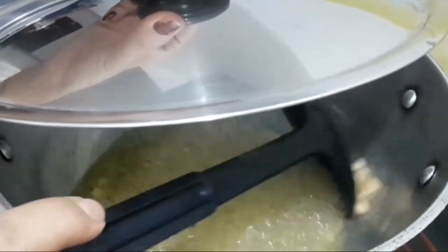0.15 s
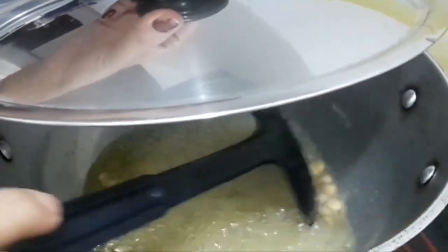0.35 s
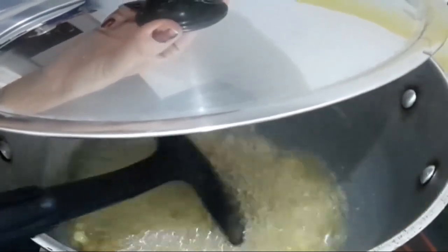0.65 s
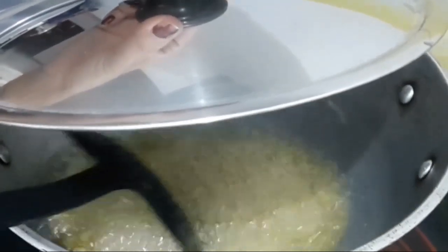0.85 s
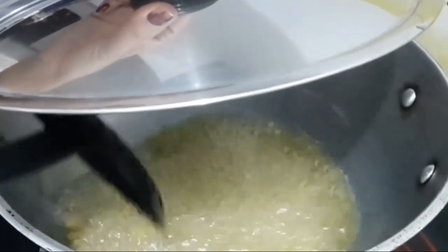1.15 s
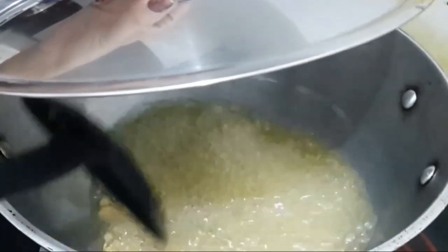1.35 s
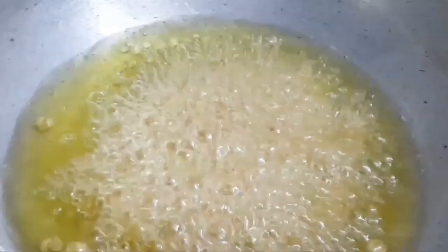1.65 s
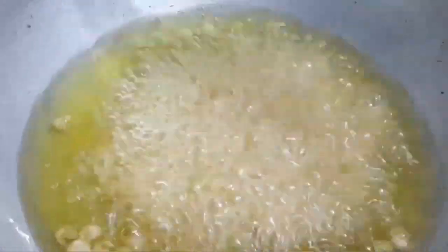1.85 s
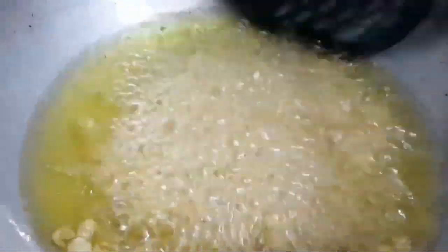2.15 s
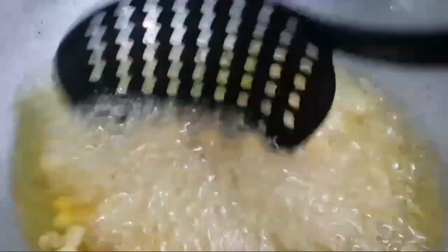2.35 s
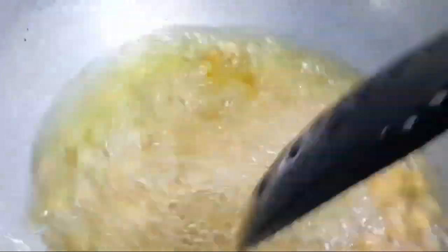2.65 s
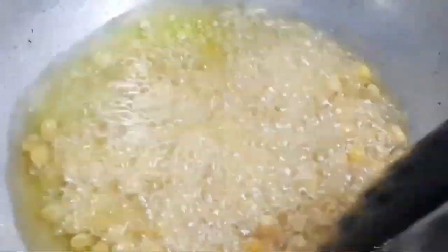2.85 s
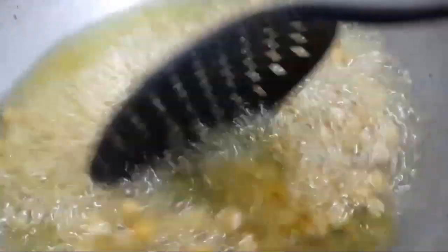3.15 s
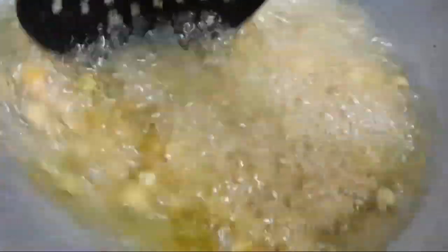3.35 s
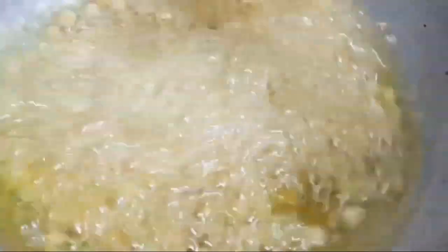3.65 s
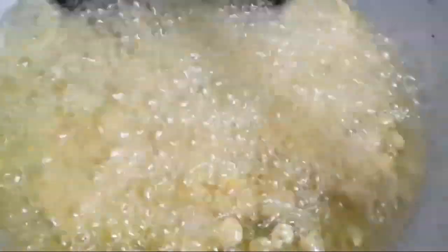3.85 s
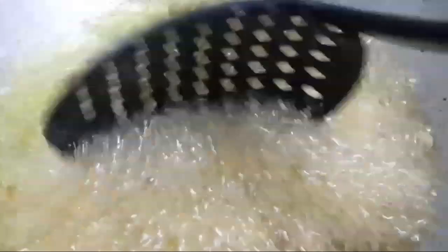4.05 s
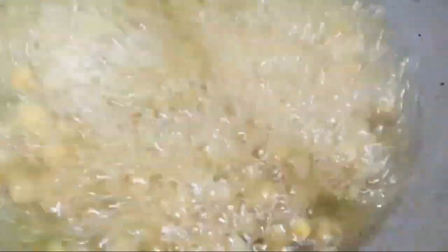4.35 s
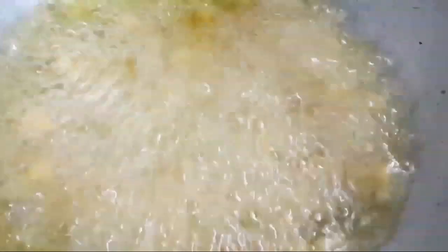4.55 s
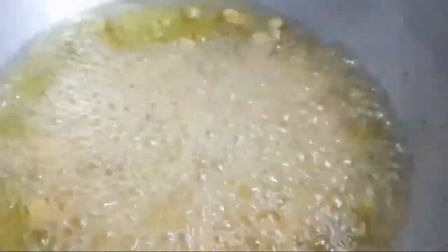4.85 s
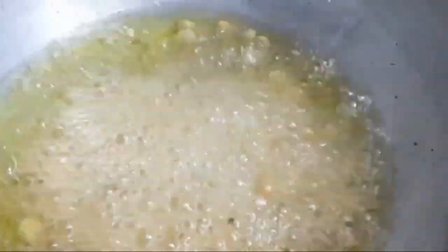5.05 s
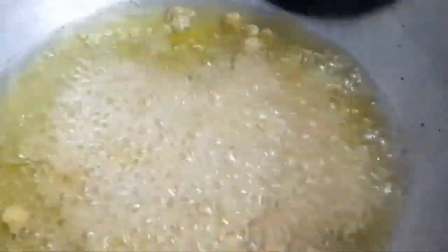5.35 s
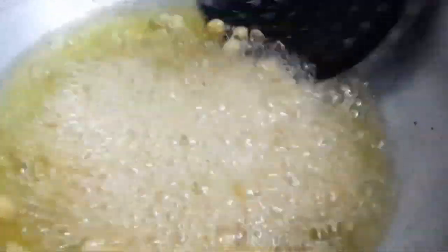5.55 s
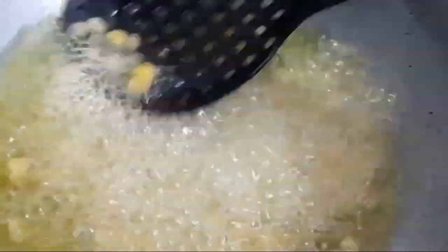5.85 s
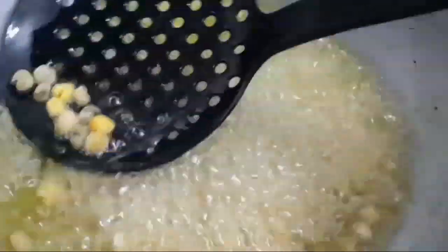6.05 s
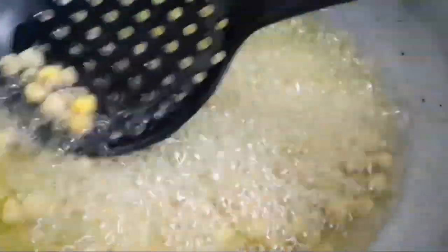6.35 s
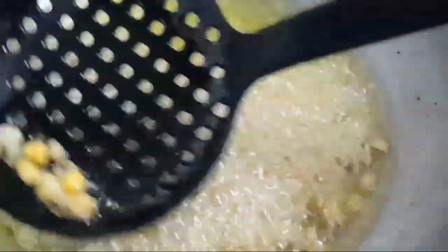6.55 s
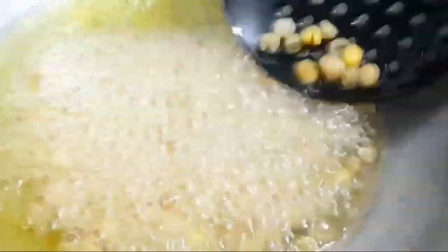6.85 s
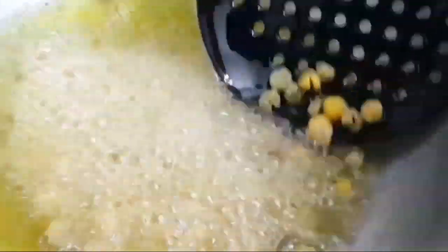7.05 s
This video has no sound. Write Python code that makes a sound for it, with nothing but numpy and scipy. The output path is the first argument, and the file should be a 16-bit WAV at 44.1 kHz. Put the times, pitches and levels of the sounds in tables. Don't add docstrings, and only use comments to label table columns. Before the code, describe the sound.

A heavy frying roar comes first, with low bubbles thumping in a metal pot partly covered by its lid. After nearly two seconds it stops, silent for an instant. Then comes an open pan, soft at first: airy sizzling full of crisp crackles, tiny ringing blisters and spitting water drops, swelling unevenly. Close stereo phone microphone in a small kitchen, brighter on the left, duller on the right.

```python
import sys
import numpy as np
from scipy import signal
from scipy.fft import rfft, irfft, next_fast_len
from scipy.io import wavfile
from scipy.ndimage import uniform_filter1d, map_coordinates

SR = 44100
rng = np.random.default_rng(int(sys.argv[2]) if len(sys.argv) > 2 else 0)


def magnitude_from_level(level_db):
    exponent = np.asarray(level_db, float) / 20
    return 10 ** exponent


def dump(signal):
    limited = np.clip(np.atleast_2d(signal).T, -1, 1)
    pcm = np.round(limited * 32767).astype(np.int16)
    wavfile.write(sys.argv[1], SR, pcm)


N = 317961
POT, PAN = 0, 1
CUT_S, WAKE_S = 1.9, 2.03


def unit(x):
    return x / np.sqrt(np.mean(x ** 2) + 1e-20)


def along(points, hz):
    f, value = np.transpose(points)
    return np.interp(np.log(hz + 1), np.log(f + 1), value)


def wobble(rate):
    knots = rng.standard_normal(int(N * rate / SR) + 4)
    return map_coordinates(knots, [np.arange(N) * rate / SR])


def filtered(x, response):
    m = next_fast_len(N + 8192)
    return irfft(rfft(x, m) * response(np.fft.rfftfreq(m, 1 / SR)), m)[..., :N]


def rings(s, size, hz, t60, rise, rough, order, count=1, swell=.001):
    t = np.arange(order) / SR
    life = t / t60[:, None]
    turn = 2 * np.pi * hz[:, None] * t * (1 + rise * np.minimum(life, 1))
    grit = uniform_filter1d(rng.standard_normal(turn.shape), count)
    wave = np.sin(turn) * (1 + rough * np.sqrt(count) * grit)
    wave *= magnitude_from_level(-60 * life) * (1 - np.exp(-life / swell))
    wave *= (size / np.abs(wave).max(1))[:, None]
    at = np.round(s * SR).astype(int)[:, None] + np.arange(order)
    return np.bincount(at.ravel(), wave.ravel(), N + order)[:N]


def bubbles(lo_hz, hi_hz, cycles, spread_db, count, order):
    u = rng.random((count, 4))
    hz = lo_hz * (min(hi_hz, SR / 2.4) / lo_hz) ** u[:, 1]
    life = cycles * 4 ** (u[:, 3] - .5)
    rank = np.minimum(-np.log(1 - u[:, 2]), 4.5)
    size = hz / np.sqrt(life) * magnitude_from_level(spread_db * rank)
    grains = rings(u[:, 0] * (N - 1) / SR, size, hz, life / hz, rise=.08, rough=0.15, order=order)
    hiss = filtered(rng.standard_normal(N), lambda f: (f > lo_hz / 2) & (f < 1.5 * hi_hz))
    return unit(grains), unit(hiss)


def froth():
    gurgle = lambda: bubbles(60, 1067, cycles=10.6, spread_db=2, count=2000, order=800)
    body = lambda: bubbles(784, 3800, cycles=34, spread_db=2.0, count=3500, order=450)
    fizz = lambda: bubbles(2800, 16000, cycles=55, spread_db=2.5, count=7000, order=220)
    return [np.array([make(), make()]) for make in (gurgle, body, fizz)]


# (time [s], vigour [dB], coarse over fine bubbles [dB])
VIGOUR = [
    [(0, -24, 1), (.125, -24, -0.5), (.27, -23.5, 1.5), (.45, -25.5, -2), (.63, -28, 1), (1.0, -27.5, -0.5),
     (1.25, -27.5, 0.5), (1.5, -28.5, -0.5), (1.8, -27.5, 2)],
    [(2.3, -46, -2), (2.8, -44.5, -1), (3.27, -44, 0.5), (3.45, -38, -0.5), (3.7, -33.5, -2.5),
     (3.85, -36.5, 0.5), (4.15, -35.5, 0.5), (4.65, -34.5, -1.5), (5.05, -38.5, 2.5), (5.2, -36.5, -0.5),
     (5.65, -36, -0.5), (5.95, -35.5, -3), (6.1, -41.5, -.5), (6.45, -40, 0.5), (6.57, -37, 1.5),
     (6.82, -38, 1.5), (6.97, -35.5, -0.5), (7.21, -33.5, -2)],
]
# (gurgle [dB], body [dB], fizz [dB])
SIZE_DB = [
    (-14, -12, 0.078),
    (-16, -9, 0.37),
]
COARSE_SHARE = (1.1, 0.8, 0)
FLARE_SHARE = (.4, .5, 1.0)
# (time [s], level [dB], half length [s])
FLARES = [(0.385, -4, .012), (0.506, -2.5, .01), (.575, -2.5, .012), (1.36, -3, 0.022), (2.315, 0.5, .02),
          (2.438, 3.5, .012), (2.67, 4.5, .05), (3.35, 0, .04), (3.922, 4, .01), (5.715, 5, 0.033),
          (5.789, 5.5, 0.0093), (5.859, 0, .015)]


def levels(vessel):
    wake_db, wake_time_s = (-23, -21, -17.5), (0.13, 0.13, .09)
    duck_s, duck_db, duck_time_s = 5.797, -3, .018
    t = np.arange(N) / SR
    s, vigour_db, coarse_db = np.transpose(VIGOUR[vessel])
    since = np.maximum(t - duck_s, 0) / duck_time_s
    base_db = np.interp(t, s, vigour_db) + vessel * duck_db * since * np.exp(1 - since)
    flare_db = sum(db * np.exp(-((t - at) / half) ** 2) for at, db, half in FLARES)
    waking = lambda time: vessel * np.exp(-np.maximum(t - WAKE_S, 0) / time)
    rows = zip(SIZE_DB[vessel], COARSE_SHARE, FLARE_SHARE, wake_db, wake_time_s)
    return [base_db + under + coarse * np.interp(t, s, coarse_db) + flare * flare_db + wake * waking(time)
            for under, coarse, flare, wake, time in rows]


def patchy(x, depth_db):
    z = signal.stft(x, nperseg=128)[2]
    field = uniform_filter1d(rng.standard_normal(z.shape[1:]), 3, 0)
    field = uniform_filter1d(field, 9, 1)
    return signal.istft(z * magnitude_from_level(depth_db * unit(field)), nperseg=128)[1][:, :N]


# (frequency [Hz], level [dB per Hz])
GURGLE = [
    [(15, -63.5), (25, -27), (76, -25.5), (117, -17), (172, -22), (210, -27), (249, -18.5), (309, -18),
     (484, -11.5), (539, -5.5), (610, -2), (898, -16), (1000, -14), (1300, -47), (2200, -120)],
    [(15, -53), (25, -15.5), (119, -16), (231, -11.5), (265, -13.5), (372, -5), (448, -5.5), (548, -4.5),
     (806, -4), (1000, 0), (1300, -41.5), (2200, -120)],
]
# (frequency [Hz], level [dB per Hz])
BODY = [
    [(500, -34), (850, -16), (1100, -7.5), (1260, 2), (1490, 2.5), (2290, -1), (2650, 1), (3500, -9.5),
     (4550, -33), (7700, -120)],
    [(500, -38.5), (850, -9.5), (1090, -3), (1440, -4), (1550, -5), (2040, -2.5), (2470, -4.5),
     (3500, -8.5), (4550, -12), (7700, -120)],
]
# (frequency [Hz], level [dB per Hz])
FIZZ = [
    [(1760, -40), (3000, -10.5), (3590, -10.5), (5470, -4.5), (6860, -1), (9890, -16.5), (14400, -19.5),
     (15600, -20.5)],
    [(1760, -35), (3000, -8.5), (6820, -6), (7830, -2.5), (8800, -2), (10300, -0.5), (12500, -9.5),
     (14600, -15), (15600, -15.5)],
]
# (frequency
# [Hz], width [Hz], level [dB])
HOLLOW = [
    [(163, 14, 6.5), (376, 12, 4), (545, 14, 6), (610, 13, 2.5), (762, 16, 7.5), (814, 20, 6),
     (1276, 25, 4), (1558, 30, 5.5), (1670, 35, 3.5), (6870, 1100, 0.5)],
    [(165.5, 14, 9.5), (241.3, 6.1, 11.5), (392, 13, 5.5), (562, 12, 7), (870, 20, -12), (1100, 62, 5),
     (1210, 9.9, 6), (2800, 1500, -0.5), (10200, 1200, 2)],
]
# (pot [dB], pan [dB])
PATCHY_DB = (1.5, 1.78)


def boiling(sizes, vessel):
    clumps = 0.45 * wobble(14) + .8 * wobble(50)
    hollow_db = lambda f: sum(db / (1 + (2 * (f - hz) / width) ** 2) for hz, width, db in HOLLOW[vessel])
    # (colour, clump dB, own dB, lift dB)
    moods = [(GURGLE, .5, 1.2, .2), (BODY, .6, .8, .8), (FIZZ, .85, .75, .3)]
    share = (.14, .28)[vessel]
    out = 0
    for pair, (colour, clump_db, own_db, lift_db), db in zip(sizes, moods, levels(vessel)):
        pair = np.sqrt(share) * pair[:, 0] + np.sqrt(1 - share) * pair[:, 1]
        pair = filtered(pair, lambda f: magnitude_from_level(along(colour[vessel], f) + hollow_db(f)))
        if colour is FIZZ:
            pair = patchy(pair, PATCHY_DB[vessel])
        swell_db = db + lift_db + clump_db * clumps + own_db * wobble(25)
        out = out + unit(pair) * magnitude_from_level(swell_db)
    return out


def spits(table, vessel):
    s, db, hz, t60, crack_db = np.transpose(table)
    t60 = np.clip(t60, .001, .03)
    same = np.ones(len(s))
    ring = rings(s, magnitude_from_level(db + 0.5), hz, 1.72 * t60, rise=0.037, rough=0.57, order=800, count=9, swell=.025)
    broad = magnitude_from_level(db + crack_db - 3) * np.sqrt(SR / hz)
    crack = 1.15 * rings(s, broad, 9000 * same, 0.00074 * same, rise=0, rough=1.7, order=100)
    puff = rings(s, magnitude_from_level(db - 10.5), 6000 * same, 1.7 * t60, rise=0, rough=8.0, order=500)
    port = lambda f: magnitude_from_level(4.5 + 0.64 * np.where(f > 3000, along(FIZZ[vessel], f), -11))
    dry = ring + filtered(crack + puff, port)
    dry = filtered(dry, lambda f: f ** 4 / (f ** 4 + 1000 ** 4))
    t = np.arange(2600) / SR
    walls = [unit(rng.standard_normal(len(t)) * magnitude_from_level(-60 * t / 0.097)) / np.sqrt(len(t)) for side in range(2)]
    near = dry + magnitude_from_level(-13) * signal.fftconvolve(dry, walls[0])[:N]
    far = magnitude_from_level(-5.0) * signal.fftconvolve(dry, walls[1])[:N]
    return np.array([near, far])


# (time [s], peak [dB], pitch [Hz], t60 [s], crack against the ring [dB])
POT_SPITS = [
    (0.1344, -15, 4970, 0.0092, -14),
    (0.3345, -11, 6700, 0.0043, -18),
    (0.5253, -12.5, 8000, 0.0049, -10),
    (0.8373, -15.5, 6400, 0.0042, -24),
    (0.9803, -14, 6870, 0.0066, -29),
    (1.1167, -13, 6500, 0.003, -17.5),
    (1.7463, -16, 6470, 0.004, -15),
    (1.7637, -14.5, 7010, 0.0067, -15.5),
]
# (time [s], peak [dB], pitch [Hz])
POT_CRACKLES = [(0.0513, -18, 6100), (0.4035, -13, 7150), (0.589, -9, 6400), (0.6424, -14, 6800),
                (0.73, -19, 6730), (0.774, -15, 6870), (0.9605, -12, 6250), (1.349, -11, 7200),
                (1.4144, -11.5, 7050), (1.5279, -10.5, 6400), (1.5943, -14, 6310), (1.6164, -16, 5820)]


def pot_drops():
    lesser = [(at, db - 2.5, hz, 0.0045, -24) for at, db, hz in POT_CRACKLES]
    return np.vstack([POT_SPITS, lesser])


# (time [s], peak [dB], pitch [Hz])
TICKS = [(2.094, -41.5, 10850), (2.2065, -30, 6780), (2.2639, -21, 9000), (2.3322, -24, 10470),
         (5.7627, -20.5, 10360), (2.4968, -24.5, 9640), (2.5614, -19, 10270), (2.6335, -17.5, 10200),
         (2.6465, -29, 11200), (2.6854, -21.5, 11140), (2.7081, -26, 6480), (2.7133, -21, 9440),
         (2.9974, -20.5, 6880), (5.9458, -27.5, 11430), (3.1758, -23.5, 7860), (3.4093, -22, 5810),
         (3.4699, -17.0, 10700), (3.5265, -16, 9680), (3.5617, -17, 8700), (4.1945, -17.0, 7880),
         (4.386, -21, 10200), (4.5858, -11.5, 10700), (5.3952, -23.5, 12600), (5.6886, -17, 13870),
         (5.9857, -21, 11500), (6.5297, -17.5, 9660), (6.5618, -14.5, 9370), (6.6249, -20.5, 6330),
         (6.7182, -19, 7620), (6.9819, -16, 8900)]
# (time [s], peak [dB])
SNAPS = [(2.39, -29.5), (2.5985, -22), (2.6752, -20.5), (2.7654, -19), (2.818, -22), (2.9514, -20),
         (3.1156, -20), (3.1434, -24), (3.7854, -14), (4.006, -10), (4.0565, -12.5), (4.0669, -12.5),
         (4.2643, -15.5), (4.2934, -21.0), (4.3036, -13), (4.4693, -16.5), (5.2782, -22.5), (5.557, -10.5),
         (5.8795, -16.0), (6.5685, -18), (6.9082, -17), (6.9182, -21.5), (7.0285, -10.5)]
# (time [s], peak [dB], pitch [Hz], t60 [s])
BLISTERS = [(2.3457, -27.5, 5700, 0.0054), (2.4543, -27, 6120, 0.006), (4.0974, -20.5, 5840, 0.007),
            (2.656, -24.5, 10700, 0.0047), (2.9417, -28.5, 8140, 0.0078), (3.3196, -18, 9540, 0.0087),
            (3.4996, -16.5, 7440, 0.0048), (3.8604, -17, 5900, 0.0067), (3.979, -14.5, 6610, 0.004),
            (4.084, -18.5, 10300, 0.0052), (4.1231, -23, 9330, 0.013), (4.2755, -17, 10070, 0.0069),
            (4.574, -21.5, 7800, 0.011), (4.7897, -17.5, 8700, 0.0063), (4.9226, -21, 10300, 0.0076),
            (5.299, -18.5, 6500, 0.0053), (5.3107, -14, 8680, 0.0061), (5.767, -11, 9980, 0.011),
            (5.7858, -16.5, 9520, 0.012), (5.832, -16, 10040, 0.0057), (5.9934, -19.5, 7680, 0.0067),
            (6.0296, -18.5, 9360, 0.012), (6.0654, -15, 7930, 0.0052), (6.2278, -24.5, 10180, 0.0061),
            (6.7789, -19, 9250, 0.015), (6.9503, -19, 7750, 0.0087), (7.0031, -16, 8360, 0.0085),
            (7.022, -15.5, 6590, 0.0046), (7.082, -18, 7020, 0.004), (7.1981, -18, 9340, 0.004)]
# (time [s], peak [dB], pitch [Hz], t60 [s], crack against the ring [dB])
POPS = [(2.264, -27, 3560, 0.0018, 0.5), (2.3107, -37, 3690, 0.009, -11), (2.3312, -36.0, 4060, 0.009, 3.5),
        (4.267, -23.5, 4000, 0.006, -11.5), (3.0037, -19, 3690, 0.0029, -11),
        (4.1394, -20, 5060, 0.013, -16), (4.3504, -17.5, 4180, 0.0021, -5),
        (4.7738, -23, 3840, 0.0085, -13), (4.8413, -25, 2070, 0.013, -9.5),
        (4.9582, -24, 5110, 0.0048, -11.5), (5.149, -18.5, 4200, 0.0042, -22.5),
        (5.1496, -20.5, 8170, .008, -25.5), (5.1502, -19.5, 9950, 0.009, -26),
        (5.3664, -16.5, 3790, 0.006, -9), (5.8984, -23.5, 2330, 0.0023, -8),
        (5.5313, -23.0, 4300, 0.0079, 0), (5.7373, -19.5, 5320, 0.0045, -15.5),
        (5.9263, -24.5, 2000, 0.0074, -16), (6.0685, -23, 2890, 0.0098, -2),
        (6.579, -17.5, 1905, 0.0014, -13.5), (6.6647, -18.5, 1680, 0.0015, -18.5),
        (6.9505, -18, 4310, 0.0024, -14.5), (7.013, -18.5, 5040, 0.0065, -11.5),
        (7.085, -24, 3840, 0.014, -8.0), (7.144, -15.5, 5450, 0.01, -8.5), (7.17, -26, 2900, 0.0026, -15)]
# (time [s], peak [dB], pitch [Hz])
CRACKLES = [(2.0502, -37, 5940), (2.1742, -32, 9350), (2.3144, -27.5, 8960), (2.4339, -24.5, 8830),
            (2.4681, -24.5, 10900), (2.5376, -23, 7750), (2.5854, -32, 10100), (2.8376, -33.5, 11110),
            (2.9115, -39.5, 9540), (2.9636, -21.5, 6240), (3.0959, -20.5, 8570), (3.2263, -23, 8340),
            (3.3702, -24.5, 10470), (3.4587, -12.5, 11020), (3.5439, -15.5, 10600), (3.581, -14.5, 10170),
            (3.6591, -14.5, 8230), (3.7797, -16, 9430), (3.7968, -21, 9220), (3.8437, -22.0, 10420),
            (3.9215, -18.5, 5000), (3.9807, -11, 9220), (4.1025, -25, 11500), (4.1715, -18.5, 1200),
            (4.3386, -14, 9430), (4.7187, -14, 6660), (5.0614, -17.5, 7970), (5.3196, -17, 7970),
            (5.4375, -18.5, 10800), (5.5777, -18, 10380), (5.6568, -15.5, 12660), (5.6985, -15.5, 8200),
            (5.7727, -17.5, 5500), (5.7915, -18, 11000), (5.8285, -17.5, 11540), (5.8575, -13, 10470),
            (5.9064, -14.5, 10420), (6.0373, -21, 9130), (6.0471, -20, 7430), (6.2339, -22.5, 8530),
            (6.264, -18.5, 10510), (6.295, -15, 10330), (6.3166, -27.5, 9910), (6.3578, -17, 10570),
            (6.4045, -18.5, 10210), (6.5158, -18, 8010), (6.5972, -15.5, 9430), (6.6983, -19.5, 9390),
            (6.8118, -20.5, 10500), (7.0332, -18.5, 11500), (7.0577, -15.5, 6300), (7.0945, -17, 2300),
            (7.0957, -13, 9170)]
# (time [s], peak [dB], pitch [Hz])
BEADS = [(2.1876, -42, 11770), (2.3913, -31, 8870), (2.4087, -38, 13460), (2.4924, -31.5, 10070),
         (2.656, -27.5, 6950), (2.7126, -32.5, 6360), (2.8484, -39, 2020), (2.9858, -39, 14010),
         (2.9972, -35.5, 1180), (3.005, -25, 10170), (3.1443, -32.5, 14050), (3.4488, -26.5, 5230),
         (3.4805, -27, 1180), (3.7179, -23, 11000), (3.844, -23.5, 5890), (3.8636, -30.5, 5800),
         (4.154, -25, 5460), (4.2, -24.5, 8170), (4.2187, -25, 6290), (4.2956, -30, 6560),
         (4.4698, -21.5, 8380), (4.4963, -24.5, 9480), (4.6434, -34.5, 5710), (4.7947, -30, 12720),
         (4.8859, -27, 3860), (4.9009, -23, 10020), (4.943, -27.5, 8260), (4.9471, -32, 13570),
         (5.2172, -30.5, 1190), (5.2789, -23, 7130), (5.3013, -18, 9270), (5.3665, -21, 8170),
         (5.4716, -25, 7200), (5.4934, -26.5, 3960), (5.5318, -19, 9350), (5.5391, -29, 3430),
         (5.5391, -30.5, 6030), (5.6968, -22.5, 5490), (5.7481, -26.5, 4550), (5.7861, -15.5, 8080),
         (6.0413, -35.5, 2210), (6.1009, -31.5, 5580), (6.2337, -30, 6420), (6.238, -31, 9350),
         (6.2778, -30, 8140), (6.3836, -29, 3360), (6.5101, -22.5, 8740), (6.6099, -28, 6400),
         (6.6638, -29, 10290), (6.92, -22, 8600), (6.9823, -29.5, 2980), (7.0985, -23, 11590),
         (7.1442, -26, 10310), (7.1703, -30, 2970), (7.1819, -22, 4800)]


def pan_drops(count):
    tick_t60_s, tick_crack_db = 0.0026, -13.5
    u, z = rng.random((count, 2)), rng.standard_normal((count, 3))
    s = WAKE_S + u[:, 0] * ((N - 1) / SR - WAKE_S)
    db = levels(PAN)[2][(s * SR).astype(int)] - 7 - 1.5 * np.log(1 - .95 * u[:, 1])
    hz = np.clip(8000 * np.exp(0.35 * z[:, 0]), 1500, 14000)
    spatter = np.transpose([s, db, hz, 0.0024 * np.exp(0.57 * z[:, 1]), -12 + 3 * z[:, 2]])
    ticks = [(at, db, hz, tick_t60_s, tick_crack_db) for at, db, hz in TICKS]
    snaps = [(at, db - 9, 10300, tick_t60_s, -4.5) for at, db in SNAPS]
    blisters = [(at, db, hz, t60, -24 - 0.57 * (db + 20)) for at, db, hz, t60 in BLISTERS]
    crackles = [(at, db - 6, hz, .004, -9.5) for at, db, hz in CRACKLES]
    beads = [(at, db + 1.5, hz, 48 / hz / 2.1, -28.5) for at, db, hz in BEADS]
    return np.vstack([ticks, snaps, blisters, POPS, crackles, beads, spatter])


# (time [s], peak [dB], pitch [Hz])
POT_GLUGS = [(0.029, -31.5, 614), (0.08, -46, 608), (0.169, -32, 697), (0.198, -27, 619), (0.228, -27, 630),
             (0.288, -29, 633), (0.411, -29.5, 619), (0.48, -36, 536), (0.507, -21, 608), (0.582, -34, 616),
             (0.627, -24, 606), (0.67, -24.5, 614), (0.706, -27, 554), (0.786, -50, 546), (0.818, -47, 611),
             (0.864, -25.5, 611), (1.026, -31, 563), (1.054, -30, 570), (1.08, -31, 592), (1.119, -35, 565),
             (1.147, -30, 622), (1.189, -29, 654), (1.199, -23, 616), (1.249, -25.5, 571),
             (1.272, -26, 622), (1.312, -27, 546), (1.385, -25.5, 552), (1.43, -34, 611),
             (1.464, -33.5, 684), (1.513, -26.5, 616), (1.546, -29.5, 630), (1.593, -33.5, 721),
             (1.642, -28, 627), (1.708, -26, 619), (1.783, -34.5, 686)]
# (time [s], peak [dB], pitch [Hz])
PAN_GLUGS = [
    (2.75, -47, 560),
    (2.885, -45, 573),
    (3.86, -45, 570),
]


def glugs(table):
    s, db, hz = np.transpose(table)
    t60 = np.full(len(s), 0.029)
    boom = rings(s, magnitude_from_level(db - 1.0), 0.992 * hz, t60, rise=0.054, rough=0, order=1800, swell=0.018)
    boom = filtered(boom, lambda f: f ** 4 / (f ** 4 + 250 ** 4))
    return np.array([boom, boom])


# (frequency [Hz], left minus right [dB])
SHADE = [
    [(60, 1), (120, -2.8), (240, 4.5), (480, 3), (950, 4), (1890, 2.5), (3770, 9), (7520, 20.5), (15000, 4)],
    [(60, -.3), (120, -0.7), (240, 3), (480, 1.5), (950, 3.5), (1890, 4.5), (3770, 4), (7520, 12.5),
     (15000, 36.5)],
]
# (frequency [Hz], coherence [0-1])
ALIKE = [(30, 0.93), (60, 1), (160, 0.91), (450, 0.93), (800, 0.84), (1300, 0.5), (3000, 0.091),
         (8000, .03)]


def microphones(near, far, vessel):
    alike = lambda f: np.clip(along(ALIKE, f), 0, 1)
    lag = lambda f: np.exp(-2j * np.pi * f * 0.00014)
    shade = lambda f: magnitude_from_level(-along(SHADE[vessel], f))

    def paths(f):
        direct = shade(f) * alike(f) * lag(f)
        diffuse = shade(f) * np.sqrt(1 - alike(f) ** 2)
        both = 2 / np.sqrt(1 + shade(f) ** 2 + 2 * shade(f) * np.real(alike(f) * lag(f)))
        return both * [f * 0 + 1, direct, diffuse]

    left, direct, diffuse = filtered(np.array([near, near, far]), paths)
    return np.array([left, direct + diffuse])


def scene():
    sizes = froth()
    pot = boiling(sizes, POT) + spits(pot_drops(), POT) + glugs(POT_GLUGS)
    pan = boiling(sizes, PAN) + spits(pan_drops(count=150), PAN) + glugs(PAN_GLUGS)
    pot, pan = microphones(*pot, POT), microphones(*pan, PAN)
    return np.where(np.arange(N) < CUT_S * SR, pot, pan)


def thinned(x):
    # (Hz, dB against the usual level), left then right
    bars = [[(500, -35.5), (1200, -15), (3000, -1.5), (5500, -8.5), (15000, -6.0)],
            [(500, -38), (1200, -18.5), (3000, -3.0), (9000, 7.0)]]
    hz, t, z = signal.stft(x, SR, nperseg=2048)
    power = np.abs(z) ** 2
    usual = np.sqrt(np.abs(uniform_filter1d(uniform_filter1d(power, 40, 1), 3, 2)))
    chance = rng.standard_normal((len(hz) // 6 + 1, len(t))).repeat(6, 0)[:len(hz)]
    bar_db = np.array([along(bar, hz) for bar in bars])[:, :, None] + 4 * unit(uniform_filter1d(chance, 4, 1))
    thin = z * (np.abs(z) > usual * magnitude_from_level(bar_db))
    thin *= np.sqrt(power.sum(2) / ((np.abs(thin) ** 2).sum(2) + 1e-20))[..., None]
    return signal.istft(thin, SR, nperseg=2048)[1][:, :N]


# (time [s], level [dB])
FADER = [
    (1.794, -0.5),
    (1.8, -14.5),
    (1.813, -36),
    (1.826, -82),
    (1.95, -90),
    (1.956, -44),
    (2.004, -38),
    (2.007, -6),
    (2.03, 1),
]


def fader(t):
    s, db = np.transpose(FADER)
    return magnitude_from_level(np.interp(t, s, db))


def top_cut(x):
    return signal.sosfilt(signal.butter(12, 16000, fs=SR, output="sos"), x)


def record(dry):
    t = np.arange(N) / SR
    gain = fader(t)
    x = filtered(thinned(dry), lambda f: f < 15750) * gain
    creep = 1 - 0.88 * np.exp(-np.maximum(t - WAKE_S, 0) / 1)
    offset = -.00045 * np.where(t < CUT_S, gain + .03, creep)
    x = x + offset + magnitude_from_level(-100) * rng.standard_normal(N)
    x = x * ((t < 1.86) | (t > 1.928))
    return top_cut(x)


dry = scene()
out = record(dry)
dump(out)
```